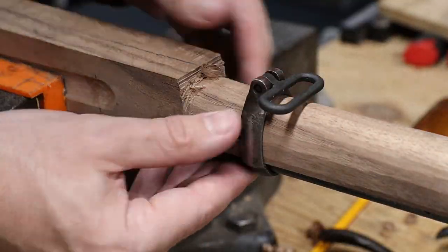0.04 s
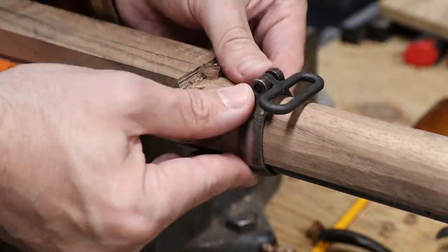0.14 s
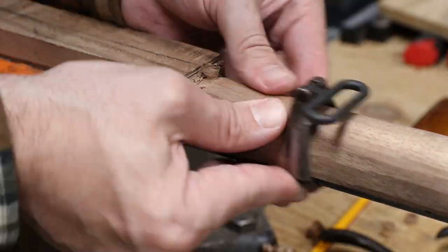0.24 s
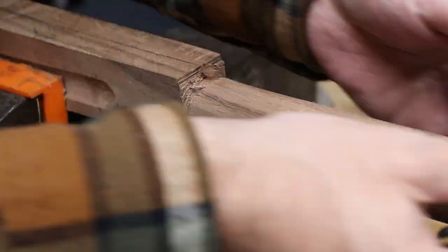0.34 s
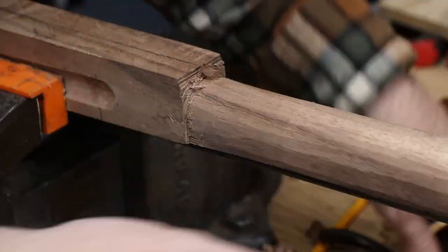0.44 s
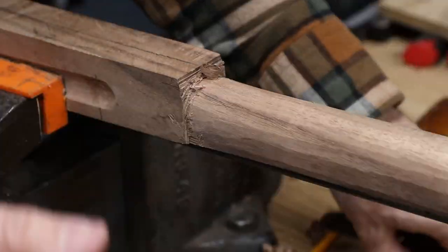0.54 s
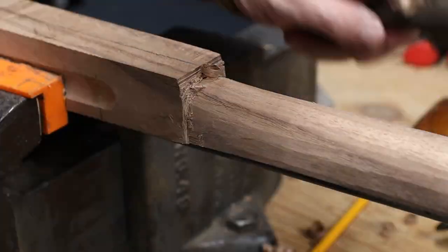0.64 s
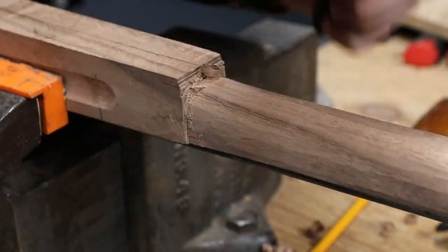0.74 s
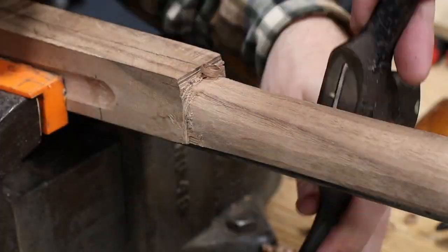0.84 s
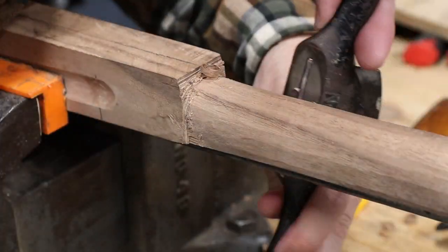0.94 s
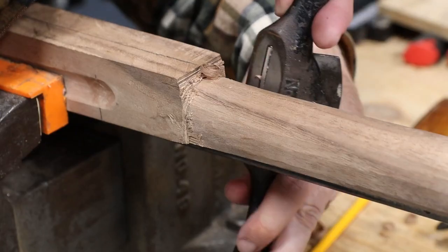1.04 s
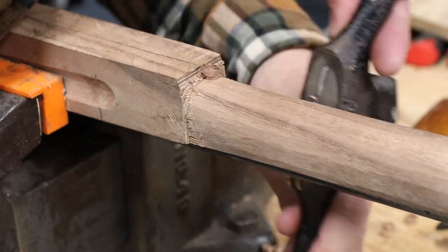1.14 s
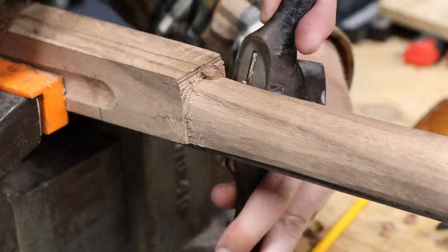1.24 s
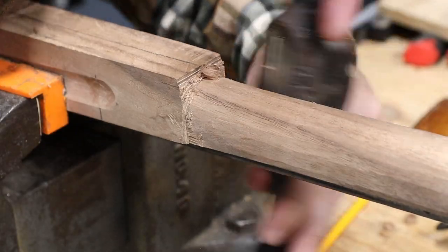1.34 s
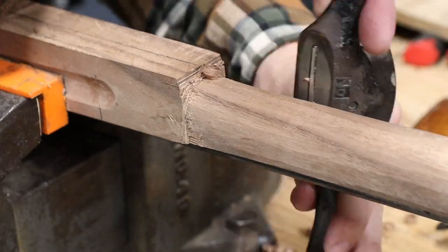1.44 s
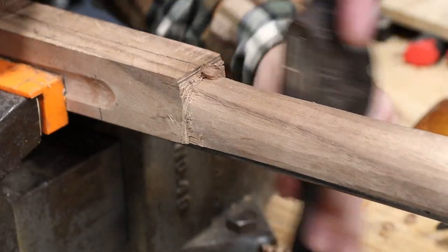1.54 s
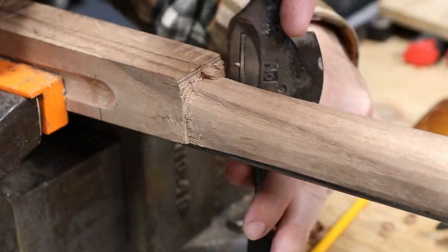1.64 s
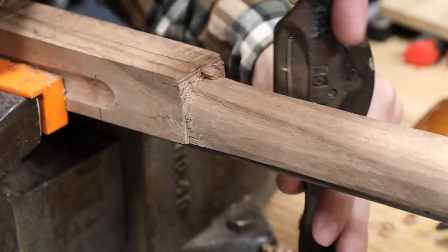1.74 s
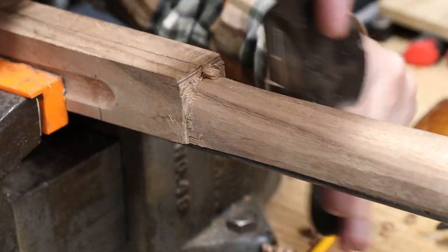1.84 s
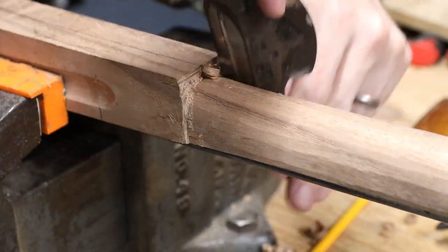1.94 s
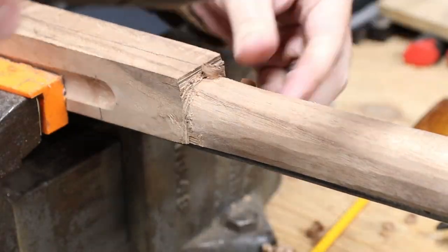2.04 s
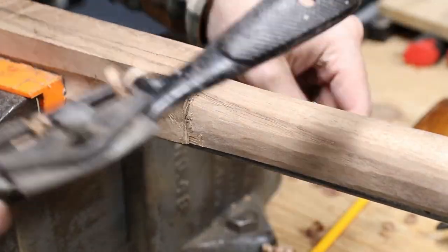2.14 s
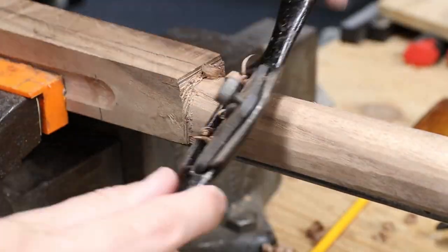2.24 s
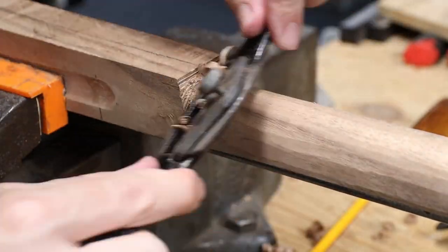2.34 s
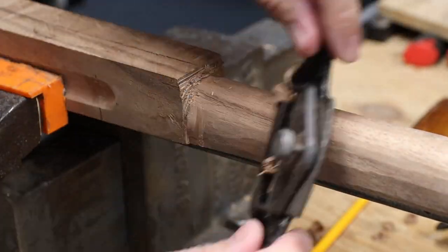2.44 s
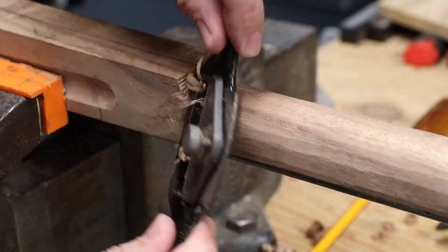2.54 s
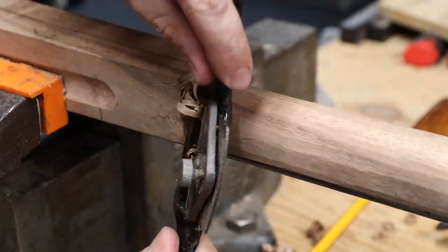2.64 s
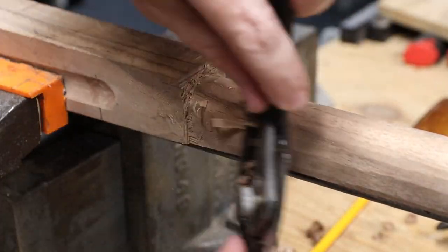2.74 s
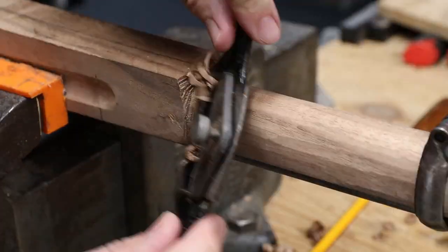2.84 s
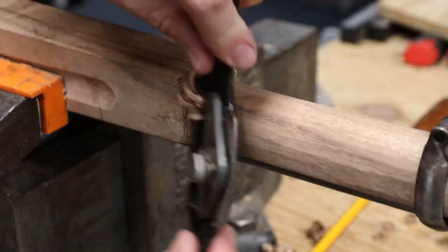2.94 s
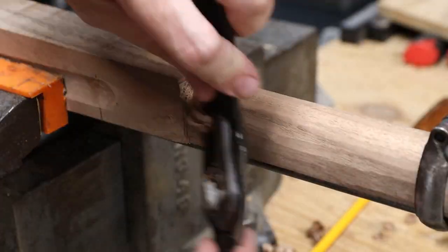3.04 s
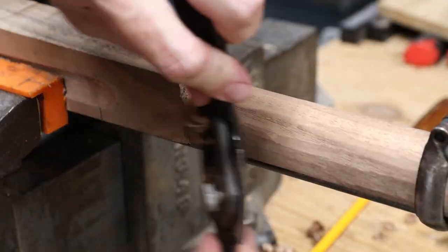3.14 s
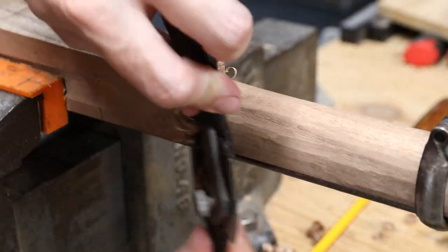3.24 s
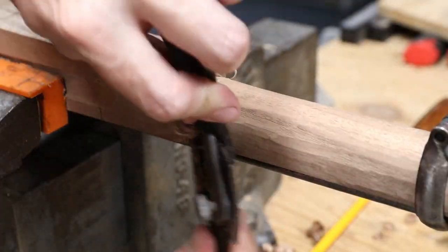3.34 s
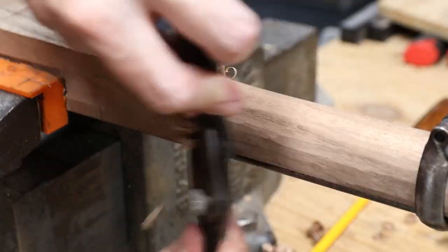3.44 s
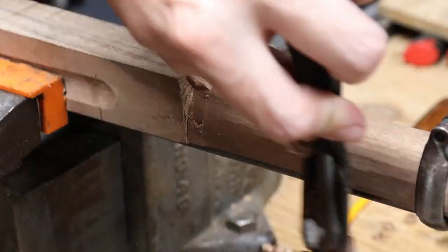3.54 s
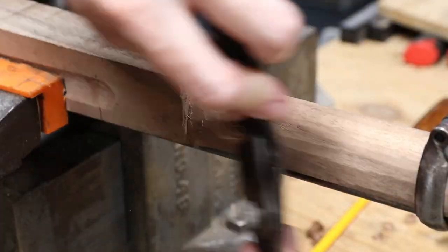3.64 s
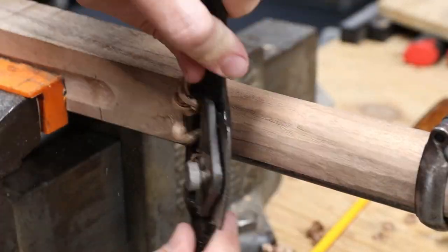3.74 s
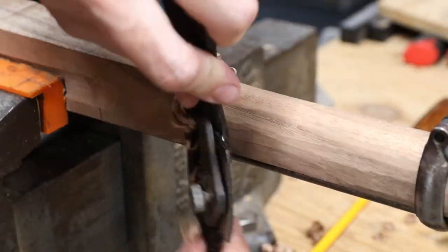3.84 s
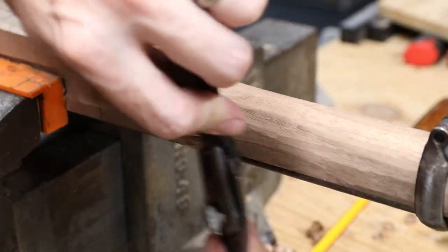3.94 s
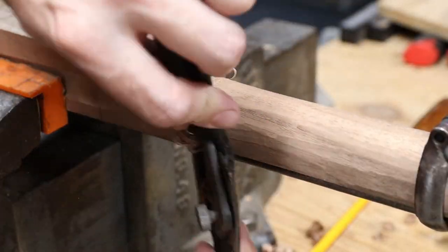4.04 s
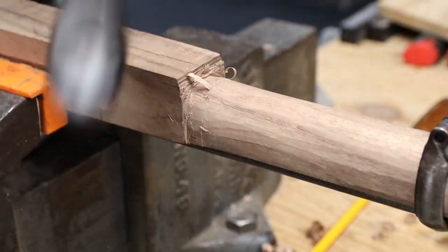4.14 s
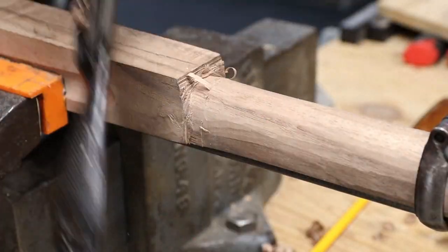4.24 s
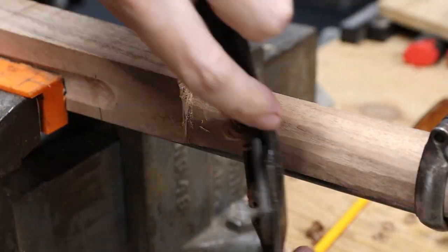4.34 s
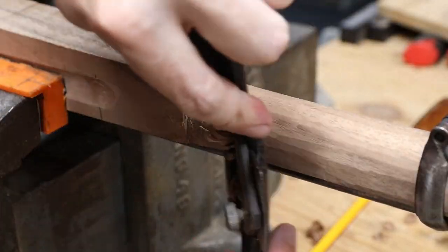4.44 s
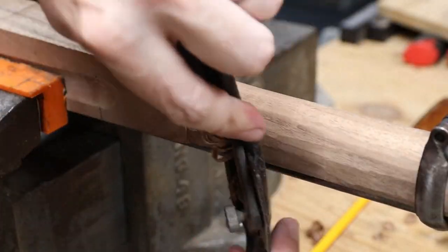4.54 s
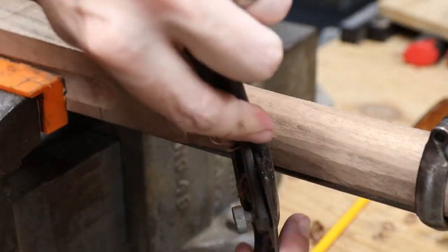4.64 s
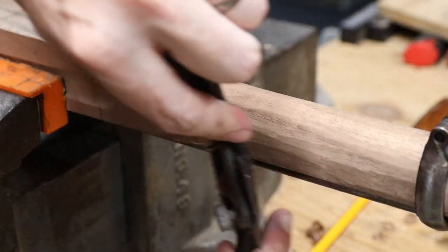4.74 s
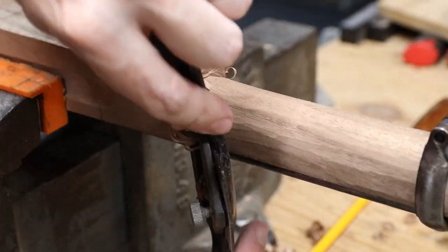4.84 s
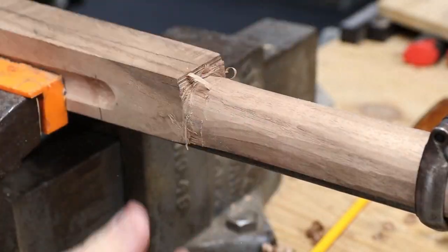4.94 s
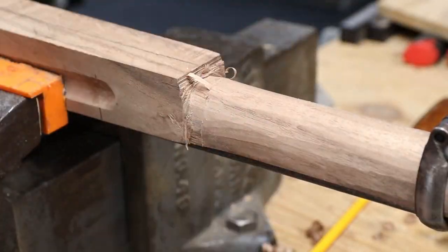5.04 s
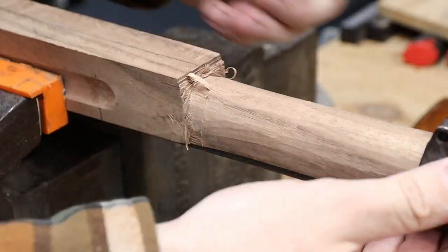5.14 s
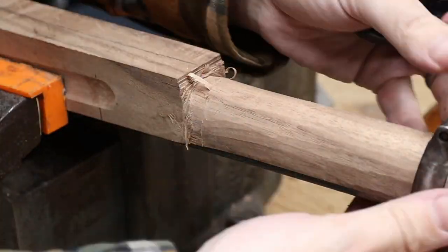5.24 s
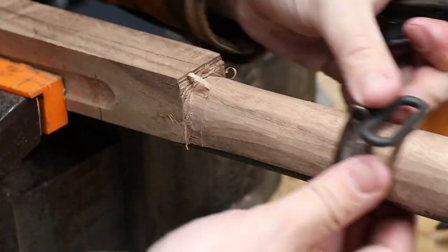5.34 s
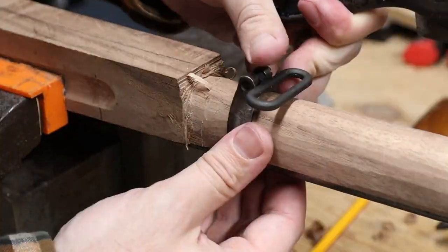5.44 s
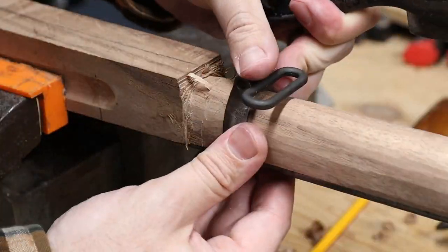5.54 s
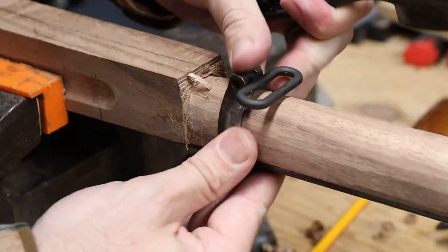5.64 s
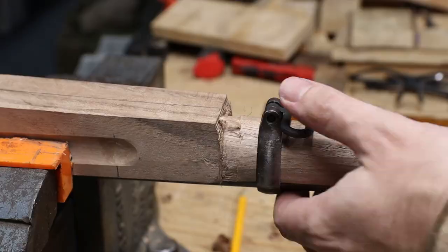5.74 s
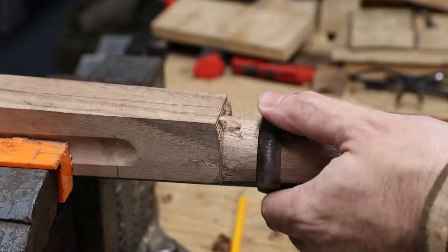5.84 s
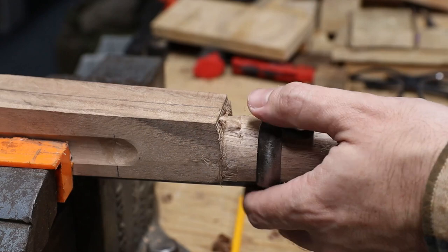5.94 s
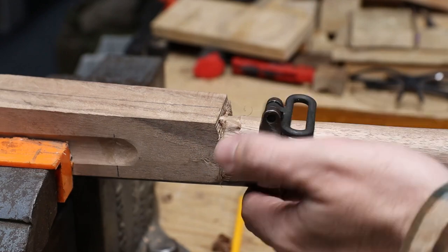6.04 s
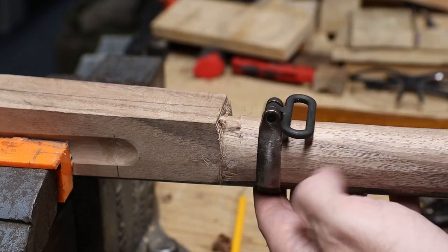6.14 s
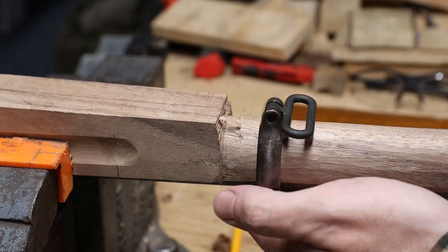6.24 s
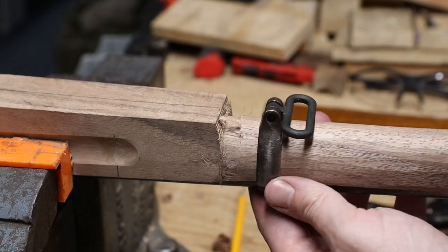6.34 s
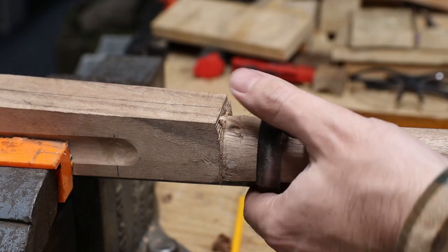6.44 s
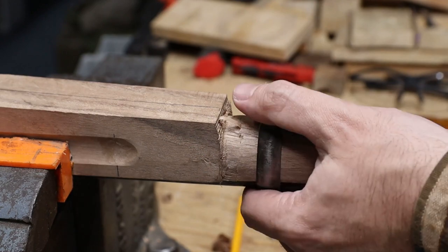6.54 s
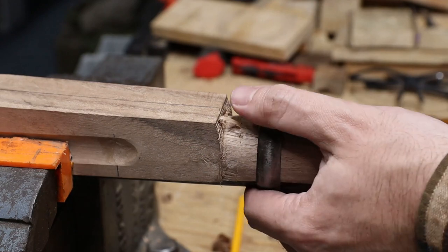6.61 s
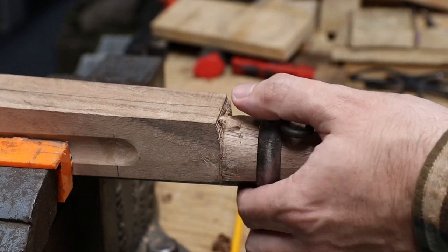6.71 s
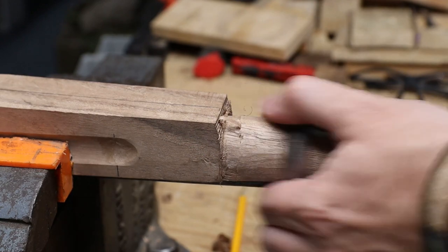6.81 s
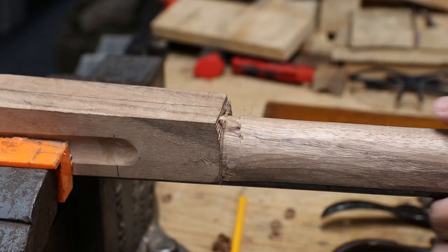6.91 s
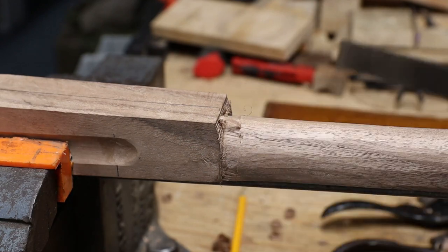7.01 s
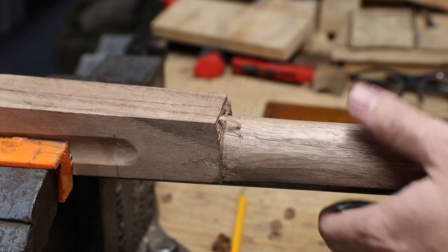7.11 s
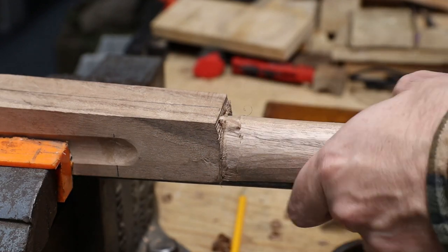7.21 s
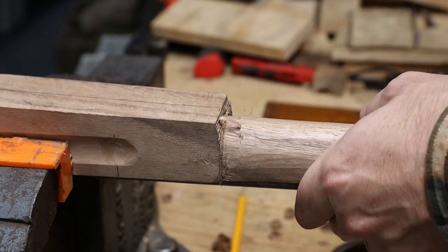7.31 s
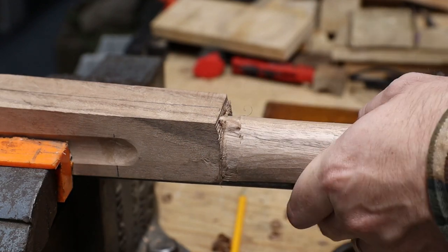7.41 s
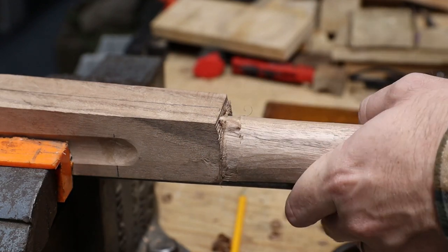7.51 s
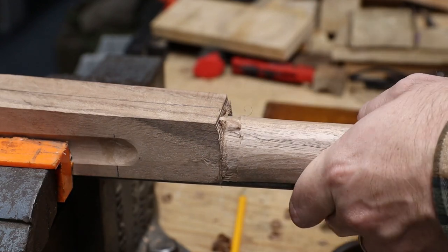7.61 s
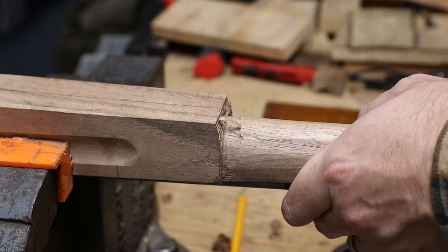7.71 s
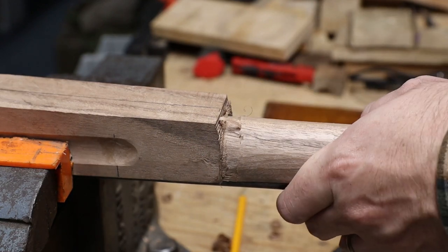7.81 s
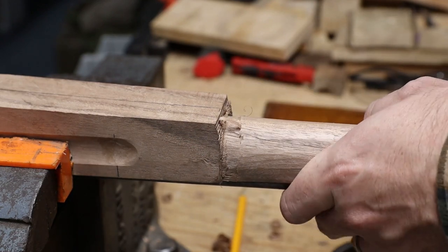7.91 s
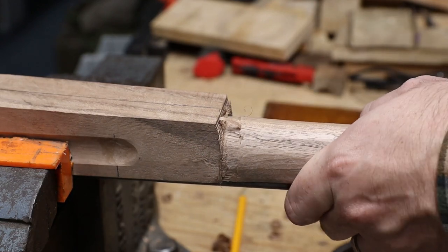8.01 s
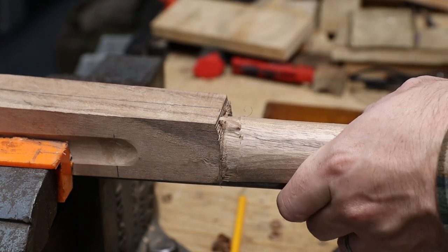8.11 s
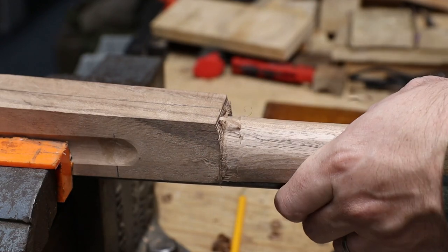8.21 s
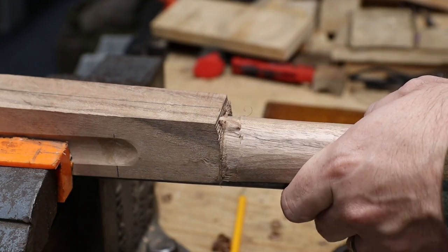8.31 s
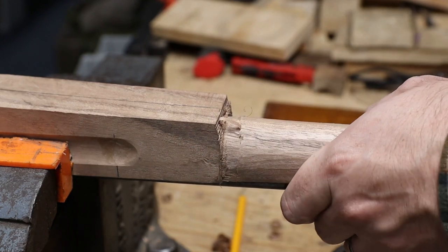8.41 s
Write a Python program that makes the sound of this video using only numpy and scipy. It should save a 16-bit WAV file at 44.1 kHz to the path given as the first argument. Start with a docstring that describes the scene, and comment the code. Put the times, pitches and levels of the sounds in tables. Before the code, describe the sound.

Quick scraping cuts of a spokeshave knock against wood, between light metal clicks and short slides, while a workshop motor hums.

```python
"""First comes the low drone of a workshop machine; a thin whine joins it later. A steel band with a loose
swivel slides over wood and ticks, and a tool is put down and rocks on the bench. Then a spokeshave
(a small two-handled blade) is pushed in quick strokes along a wooden stock held in a vise. Each cut
tears fibres and ends in a knock against a shoulder, a step in the wood; the stock bends and hums after
every knock. Near the end come more slides, steel ticks and soft thumps of the stock."""
import sys
import numpy as np
from scipy import signal
from scipy.io import wavfile
from scipy.ndimage import uniform_filter1d

SR = 44100
rng = np.random.default_rng(int(sys.argv[2]) if len(sys.argv) > 2 else 0)


def transcribe(signal):
    """Save signal, clipped to [-1, 1], as a 16-bit WAV file at the path in sys.argv[1]."""
    frames = np.atleast_2d(signal).T
    limited = np.clip(frames, -1, 1)
    pcm = np.round(limited * 32767).astype(np.int16)
    wavfile.write(sys.argv[1], SR, pcm)


N = 373527
T = np.arange(N) / SR

# the drone steps down and up again: t/s, gain of hum and low air noise/dB, gain of higher air noise/dB
DRONE_STEPS = [(0, -1.5, 3.5), (2.9, -1, 3), (3.0, -5, -3), (5.701, -7.5, -2.5), (5.723, 0, 4),
               (6.4, -1.5, 3), (8.47, -0.5, 2)]
# steady pitches of the motor: f/Hz, base level/dB
MOTOR_TONES = [(91.5, -86), (156.1, -83), (220.7, -83.5), (247.6, -68), (279.9, -82), (312.2, -76.5),
               (479.1, -83), (656.8, -89.5)]
# tone colour of the air noise: f/Hz, relative level per hertz/dB
AIR_SHAPE = [(18, -60), (30, -30), (118, -28), (252, -1.5), (404, -15.5), (512, -12), (760, -21),
             (866, -19), (1430, -24.5), (1810, -30), (2900, -26), (4420, -37.5), (5170, -24), (5740, -37),
             (16000, -48)]
# band, blade and hands sliding on wood: t/s, length/s, level/dB, bite f/Hz, relative hiss level/dB
# (the "bite" is the pitch that a scrape sings around)
SLIDES = [(0.281, 0.081, -50.5, 1930, 3.5), (0.349, 0.12, -64.5, 3970, 9.5), (0.415, 0.045, -54, 1204, -3),
          (0.932, 0.061, -55.5, 3750, -12), (0.98, 0.089, -53.5, 1105, -10.5),
          (1.067, 0.097, -51, 1217, -10), (1.187, 0.059, -57, 2850, -2), (2.142, 0.031, -74.5, 1010, 8),
          (2.314, 0.07, -64.5, 912, -4), (5.372, .12, -58.5, 6140, 1.5), (5.581, 0.04, -74, 1320, 6),
          (5.645, 0.027, -68, 1930, -2), (5.705, 0.096, -69, 5460, 4.5), (5.93, 0.05, -72.5, 2200, 8.5),
          (6.272, 0.07, -71, 1380, -19), (6.967, .125, -62, 6200, -6), (7.04, .08, -58.5, 2970, -6),
          (7.13, 0.063, -67, 2290, -23), (7.868, .035, -72, 896, 8), (8.165, 0.073, -86, 895, 7),
          (8.266, 0.057, -66.5, 1510, 7)]
# band and swivel ticking: t/s, peak level/dB, centre f/Hz
STEEL_TICKS = [(0.2911, -30, 12400), (0.304, -29.5, 7450), (0.3257, -27.5, 10200), (0.342, -30.5, 6650),
               (0.4301, -31, 1760), (0.4417, -41, 1310), (1.109, -37, 1350), (1.132, -33.5, 1890),
               (1.79, -38.5, 3100), (2.343, -39, 10600), (5.089, -53, 8100), (5.215, -41.5, 3130),
               (5.351, -43.5, 2835), (5.583, -52, 1410), (5.6383, -51, 2040), (5.9837, -48.5, 1410),
               (6.0671, -52, 8600), (6.071, -56, 1240), (6.128, -53, 5360), (6.2397, -55, 5800),
               (6.2855, -60, 1330), (6.9044, -24, 2980), (6.9275, -21, 3120), (6.942, -32, 5800),
               (7.049, -36.5, 2300), (7.125, -33.5, 1500), (7.1294, -42, 2900), (7.1628, -42.5, 2400),
               (7.2476, -19, 3130), (7.2953, -45, 8060), (8.1777, -57, 8170), (8.29, -51.5, 1430),
               (8.362, -50.5, 3700)]
# soft low thumps of the stock: t/s, peak level/dB
STOCK_THUMPS = [(0.304, -43), (1.148, -45.5), (1.49, -47.5), (1.589, -43.5), (1.756, -38), (5.824, -52),
                (5.972, -51.5), (6.064, -47), (6.911, -42), (6.926, -37.5), (7.893, -49), (7.921, -53),
                (8.201, -50), (8.267, -48), (8.302, -41.5)]
# taps of the rocking tool: t/s, peak level/dB
ROCKING_TAPS = [(0.526, -33), (0.537, -23.5), (0.551, -27), (0.563, -26), (0.571, -21.5), (0.6, -27),
                (0.606, -26.5), (0.611, -13), (0.635, -26.5), (0.65, -36), (0.665, -31), (0.682, -35),
                (0.694, -36.5), (0.711, -37), (0.718, -37), (0.739, -48), (0.746, -41), (0.773, -44),
                (0.805, -47.5), (0.849, -47.5)]
EDGE_TAPS = (7, 10, 12, 14, 16)  # rows that land on a steel edge
# spokeshave strokes: knock t/s, crack level/dB, wood tone level/dB, bend level/dB,
# cut length/s, cut level/dB, bite f/Hz, level of the drag back/dB
SHAVE_STROKES = [(1.3035, -26.5, -21.5, -29.5, 0.051, -40.5, 1254, -58),
                 (1.4281, -26, -20.5, -32, 0.027, -49, 2000, -55),
                 (1.561, -29.5, -25.5, -32.5, 0.029, -48, 5650, -52.5),
                 (1.7146, -23.5, -20, -31, .05, -38.5, 1833, -57.5),
                 (1.8591, -29, -23.5, -45, 0.043, -38.5, 1783, -63.5),
                 (1.9789, -19.5, -22, -36, 0.038, -42.5, 2590, -76),
                 (2.43, -34.5, -33.5, -38, 0.053, -46.5, 1284, -56),
                 (2.584, -37, -34, -37, 0.056, -39, 1823, -58),
                 (2.7122, -30.5, -42, -37, 0.04, -34, 1392, -61),
                 (2.84, -51, -62, -65, 0.0271, -35.5, 1867, -82),
                 (2.8903, -39, -37.5, -40, 0.025, -51.5, 1257, -75),
                 (2.995, -26.5, -28.5, -34.5, 0.031, -45.5, 1780, -62.5),
                 (3.0862, -24, -26, -30.5, .028, -42, 2270, -58),
                 (3.1837, -18, -49, -28.5, 0.031, -51.5, 2660, -57.5),
                 (3.286, -17.5, -43.5, -28, 0.024, -52, 3860, -55),
                 (3.3896, -16.5, -38, -28.5, 0.022, -47, 1270, -61),
                 (3.5252, -17, -35.5, -27.5, 0.036, -37, 1897, -53.5),
                 (3.6593, -16, -40.5, -27, 0.04, -39, 2490, -57),
                 (3.7913, -15.5, -32, -27, 0.039, -42, 2780, -64.5),
                 (3.897, -19, -48.5, -31, 0.031, -49, 3840, -57),
                 (3.986, -15.5, -36.5, -30, 0.019, -51.5, 1920, -64.5),
                 (4.0868, -15.5, -50.5, -29, .025, -55, 1350, -86.5),
                 (4.5437, -14.5, -38.5, -29, 0.052, -50, 1320, -77),
                 (4.6469, -18, -26, -28.5, 0.019, -51.5, 1326, -74),
                 (4.7634, -22.5, -42, -30, 0.031, -52.5, 1055, -65.5),
                 (4.8858, -22.5, -62, -33.5, 0.026, -55.5, 1234, -88)]
# the tool lands or rebounds without cutting: t/s, crack level/dB, wood tone level/dB, bend level/dB
TOOL_LANDINGS = [(0.9244, -19, -29, -39), (2.304, -40.5, -39, -48.5), (3.0092, -30, -50, -44),
                 (3.1058, -34.5, -40, -50), (3.8155, -34, -40.5, -40), (4.4228, -25.5, -48, -51.5),
                 (4.593, -38, -54.5, -57), (4.6882, -35, -55, -64)]
# modes (natural tones) of the stock, steel band and bench:
# f/Hz, relative level/dB, ring time/s before ring() caps and scales it
STOCK_MODES = [(1310, -20, 0.16), (1336, 0, 0.056), (1984, -5, 0.097), (2600, -10.5, 0.02),
               (2867, -2, 0.057), (3200, -4.5, 0.025), (4000, -5.5, 0.042), (4290, -16.5, 0.044),
               (4300, -12, 0.024), (6485, -22, 0.014), (6500, -12.5, 0.015), (8400, -13.5, 0.023),
               (8100, -2.5, 0.022), (11010, 9.5, 0.014)]
STEEL_MODES = [(1433, -8, 0.055), (3220, -11, 0.092), (3840, -8.5, 0.032), (4420, -5.5, 0.032),
               (4860, -10.5, 0.027), (6860, -36.5, 0.016), (7670, -10.5, 0.019), (8150, -8, 0.075),
               (7770, -19.5, 0.022), (8840, -28, 0.0153), (12100, -0.5, 0.012), (13230, -28.5, 0.11)]
BENCH_MODES = [(1035, -2.5, 0.0026), (1220, -0.5, 0.17), (1770, -2, 0.13), (2520, -14.5, 0.15),
               (3480, -12.5, 0.087), (4810, -26, 0.026), (5170, -9, 0.083), (7500, -42, 0.12),
               (7246, -24, 0.0087)]


def undb(db):
    """Turns decibels into a gain."""
    return 10 ** (np.asarray(db) / 20)


def unit(x):
    """Scales x to an average (rms) level of 1."""
    return x / np.sqrt(np.mean(x ** 2))


def band(x, lo_hz, hi_hz):
    """Keeps the part of x between two frequencies."""
    edges_hz = [lo_hz, min(hi_hz, .45 * SR)]
    return signal.sosfilt(signal.butter(3, edges_hz, "bandpass", fs=SR, output="sos"), x)


def fade(t, t60):
    """Dies away by 60 dB in t60 seconds."""
    return np.exp(-np.log(1000) * t / t60)


def burst(size, t60):
    """Dying noise, size samples long."""
    return rng.standard_normal(size) * fade(T[:size], t60)


def walk(rate):
    """Glides to a new random value rate times a second."""
    step = int(SR / rate)
    held = np.repeat(rng.standard_normal(N // step + 1), step)
    return unit(uniform_filter1d(held, step)[:N])


def add(out, s, x, db):
    """Mixes x in at time s with its peak at db."""
    i = int(s * SR)
    out[i:i + len(x)] += (undb(db) * x / np.abs(x).max())[:N - i]


def patchy(x, edges_hz, depth_db, rate):
    """Neighbouring bands of x, each swelling and sinking on its own."""
    bands = zip(edges_hz, edges_hz[1:])
    return unit(sum(band(x, lo, hi) * undb(depth_db * walk(rate)) for lo, hi in bands))


def ring(x, modes, scatter_db, ring_scale):
    """x sets an object's modes ringing, a little differently every time."""
    out = 0
    for hz, db, t60 in modes:
        detune, louder = rng.standard_normal(2)
        decay = np.log(1000) / (ring_scale * min(t60, .08) * SR)
        pole = np.exp(2j * np.pi * hz * (1 + .022 * detune) / SR - decay)
        out = out + undb(db + scatter_db * louder) * signal.lfilter([1], [1, -pole], x).imag
    return out


def blow(modes, chatter_s, wash_gain, wash_s, ring_scale):
    """A contact chatters and rings the modes; countless weak modes blur into a wash of noise."""
    t = T[:5000]
    contact = rng.standard_normal(len(t)) ** 3 * fade(t, chatter_s)
    tone = ring(contact, modes, 1.6, ring_scale)
    wash = burst(len(t), wash_s) * np.minimum(1, t / .0015)
    snap = contact * fade(t, .01)  # the first touch
    return sum(gain * x / np.abs(x).max() for gain, x in [(1, tone), (wash_gain, wash), (.65, snap)])


def drone():
    """A motor hums over wavering air noise; a thin whine joins later."""
    times, *gains_db = np.transpose(DRONE_STEPS)
    low_gain, high_gain = (undb(np.interp(T, times, db)) for db in gains_db)
    hum = air = 0
    for hz, db in MOTOR_TONES:
        tone = np.sqrt(2) * np.sin(2 * np.pi * (hz * T + rng.random()))
        hum = hum + undb(db + 3.5 * walk(16)) * tone
    shape_hz, shape_db = np.transpose(AIR_SHAPE)
    for hz in 35 * 2 ** np.arange(0, 9, 1 / 3):  # three bands to the octave
        db = np.interp(np.log(hz), np.log(shape_hz), shape_db) + 10 * np.log10(hz)
        noise = unit(band(rng.standard_normal(N), hz / 2 ** (1 / 6), hz * 2 ** (1 / 6)))
        waver_db = (3.1 if hz < 3000 else 1.5) * walk(24)
        air = air + undb(db + waver_db) * noise * (low_gain if hz < 600 else high_gain)
    whine = unit(band(rng.standard_normal(N), 5037, 5183)) * undb(-80 + 1.8 * walk(25))
    return low_gain * hum + undb(-68) * unit(air) + whine * (T > 5.712)


def passes():
    """Lists every slide, cut and drag back for rubbing(); crest is how far along it is loudest."""
    slide_crest, cut_crest, drag_crest = .47, .85, .62
    slide_bite_db, slide_shake_db, overrun_s = 2, -9.5, .0031
    drag_hz, drag_bite_db, drag_hiss_db = 4220, -1.5, -3.5
    for s, length, db, hz, hiss_db in SLIDES:
        yield s, length, slide_crest, db, hz, slide_bite_db, hiss_db, slide_shake_db
    knock_times = np.array(SHAVE_STROKES)[:, 0]
    gaps = np.minimum(np.diff(knock_times, append=np.inf), .14)
    for (s, _, _, bend_db, length, cut_db, hz, drag_db), gap in zip(SHAVE_STROKES, gaps):
        # deeper cuts sing more and hiss less
        bite_db = -4 + .24 * (cut_db + 47.5)
        hiss_db = -5 - .32 * (cut_db + 46.5)
        shake_db = bend_db - 20.5 - cut_db
        # the cut runs a little past the knock, then the tool is dragged lightly back
        yield s - length, length + overrun_s, cut_crest, cut_db, hz, bite_db, hiss_db, shake_db
        yield (s + .23 * gap, .48 * gap, drag_crest, drag_db,
               drag_hz, drag_bite_db, drag_hiss_db, slide_shake_db)


def rubbing():
    """Fibres tear in dense uneven ticks; each pass sings around its own bite and shakes the stock."""
    snags_db = 2.44 * rng.exponential(size=N // 30 + 1).repeat(30)[:N]
    tear = rng.standard_normal(N) * undb(snags_db + 2 * walk(150))
    rough = unit(tear) + unit(ring(tear, STOCK_MODES, scatter_db=1.5, ring_scale=.15))
    scrape = patchy(rough, [1050, 1560, 2490, 3280, 4900, 6440], depth_db=4, rate=70)
    hiss = patchy(tear, [6100, 9000, 13400, 14400], depth_db=3.5, rate=37)
    shake = unit(band(tear, 240, 400)) + .82 * unit(band(tear, 400, 810))
    wander = 2 ** (.08 * walk(45))  # the pitch wanders as the shaving thickens and thins
    grain = tear + 1j * rng.permutation(tear)
    out = np.zeros(N)
    for s, length, crest, db, bite_hz, bite_db, hiss_db, shake_db in passes():
        start, size = int(s * SR), int(length * SR)
        part = slice(start, start + size)
        progress = np.arange(size) / size
        swell = np.sin(np.pi / 2 * np.interp(progress, [0, crest, 1], [0, 1, 0]))
        pitch_hz = bite_hz * wander[part] * 2 ** (.3 * (progress - .5))  # climbs 0.3 octave
        # smoothed noise, shifted up to that pitch, makes the bite
        pole = np.exp(-2 * np.pi * .15 * bite_hz / SR)
        smooth = signal.lfilter([1], np.poly([pole, pole]), grain[part])
        bite = unit((smooth * np.exp(2j * np.pi * np.cumsum(pitch_hz) / SR)).real)
        sound = unit(scrape[part]) + undb(bite_db) * bite
        sound += undb(hiss_db) * hiss[part] + undb(shake_db) * shake[part]
        out[part] += undb(db) * swell * sound
    return out


def ticks():
    """The band and swivel hit steel or wood; each tick favours its own range of pitch."""
    out = np.zeros(N)
    for s, db, hz in STEEL_TICKS:
        octaves = np.clip(1.29 + .1 * (db + 40.5), .2, 5)  # harder ticks are broader
        spread = 2 ** (octaves / 2)
        ring_s = .049 * (hz / 3000) ** -.3  # high ticks die sooner
        hit = blow(STEEL_MODES, .27 * ring_s, wash_gain=1.12, wash_s=ring_s, ring_scale=8 * ring_s)
        low_hz = min(max(hz / spread, 970), .876 * hz)  # small steel parts carry no bass
        add(out, s, band(hit, low_hz, hz * spread) + .17 * band(hit, 1106, 10840), db)
    return out


def bend(hz, rise_s):
    """The clamped stock swings at a low pitch, with a weaker second tone above it."""
    t = T[:8000]
    swing = np.sin(2 * np.pi * hz * t) + .34 * np.sin(2 * np.pi * 425.7 * t) * fade(t, .54)
    build_up = 1 - np.exp(-(t / rise_s) ** 2)
    return swing * build_up * fade(t, .083)


def thumps():
    """The stock gives soft low thumps as it is handled or the tool drags back."""
    out = np.zeros(N)
    for s, db in STOCK_THUMPS:
        add(out, s, bend(hz=288.3, rise_s=.001), db)
    return out


def rocking():
    """A tool rocks on the bench with dull taps; harder taps and those on a steel edge are brighter."""
    out = np.zeros(N)
    t = T[:3000]
    steel_ring = np.sin(2 * np.pi * 4400 * t) * fade(t, .064)  # a thin part of the tool rings on
    for row, (s, db) in enumerate(ROCKING_TAPS):
        hit = blow(BENCH_MODES, chatter_s=.0061, wash_gain=1.8, wash_s=.051, ring_scale=.19)
        treble_db = db + (-19 if row in EDGE_TAPS else -32.5) + .45 * (db + 29.5)
        add(out, s, band(hit, 520, 2500), db)
        add(out, s, band(hit, 4200, 7740), treble_db)
        add(out, s, steel_ring, min(treble_db - 7.5, -45))
    return out


def knocks():
    """The spokeshave strikes the stock: a crack and a woody tone, then the hum of the bending wood."""
    out = np.zeros(N)
    for s, crack_db, wood_db, bend_db, *_ in SHAVE_STROKES + TOOL_LANDINGS:
        hit = blow(STOCK_MODES, chatter_s=.031, wash_gain=.94, wash_s=.017, ring_scale=.29)
        treble_db = -31.5 + 1.15 * (crack_db + 19)
        add(out, s, band(hit, 944, 1400), wood_db)
        add(out, s, band(hit, 1090, 6400), crack_db)
        add(out, s, band(hit, 6300, 23000), treble_db)
        # steel meets the wood with one sharp edge
        add(out, s + .0015, band(burst(400, t60=.0036), 1100, 7000), crack_db - 3.5)
        # the stock swings up and down, and sideways at a lower pitch
        add(out, s + .0015, bend(hz=317.3, rise_s=.0077), bend_db)
        add(out, s, bend(hz=254, rise_s=.0024), wood_db - 14)
        # the vise and bench take the shock as a rough low thud
        thud = burst(5000, t60=.092)
        add(out, s + .0033, band(thud, 350, 570), bend_db - 11)
        add(out, s, band(thud, 170, 290), bend_db - 16.5)
        add(out, s, band(thud, 20, 120), bend_db - 34)
    return out


def room_echo(x, t60):
    """The bench and nearby walls throw back a brief echo, mostly above the bass."""
    tail = burst(int(t60 * SR), t60)
    tail /= np.sqrt(np.sum(tail ** 2))
    return band(signal.fftconvolve(x, tail)[:N], 1200, 10000)


def scene():
    """The drone, the work at the bench and its echo, the same in both channels."""
    work = rubbing() + ticks() + thumps() + rocking() + knocks()
    heard = drone() + work + undb(-9) * room_echo(work, t60=.076)
    return np.array([heard, heard])


def record(dry):
    """Cuts off the treble above 16100 Hz."""
    return signal.sosfilt(signal.ellip(10, .2, 80, 16100, fs=SR, output="sos"), dry)


dry = scene()
out = record(dry)
transcribe(out)
```